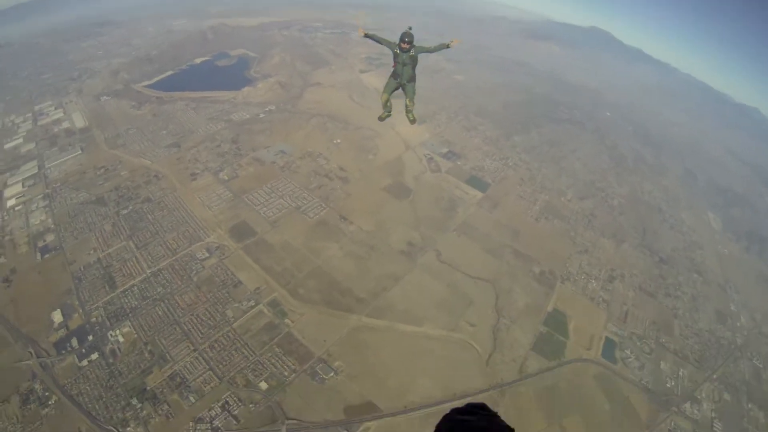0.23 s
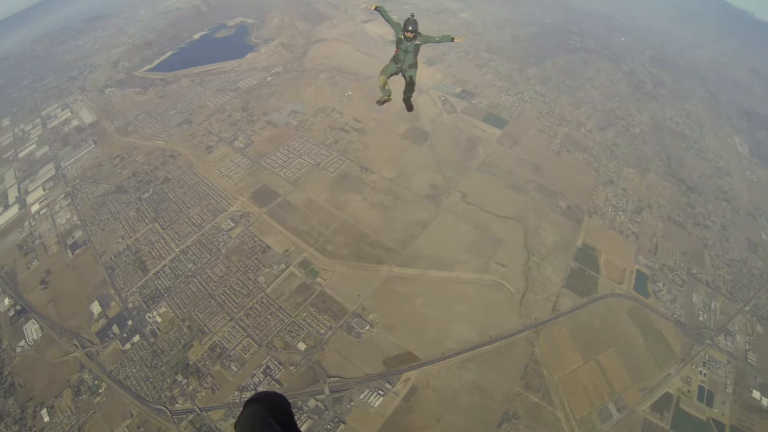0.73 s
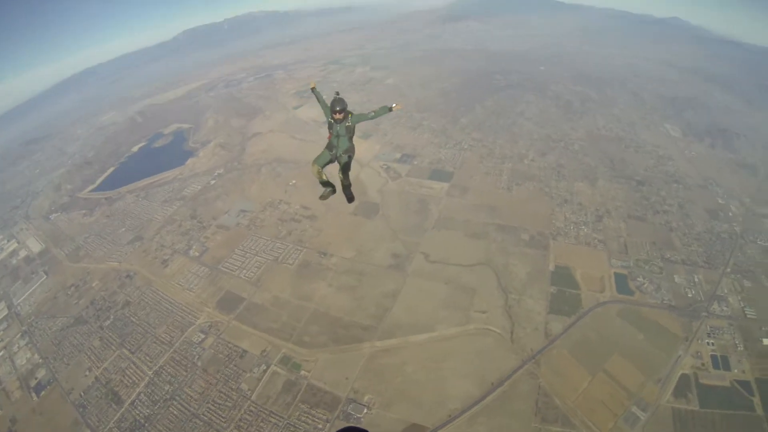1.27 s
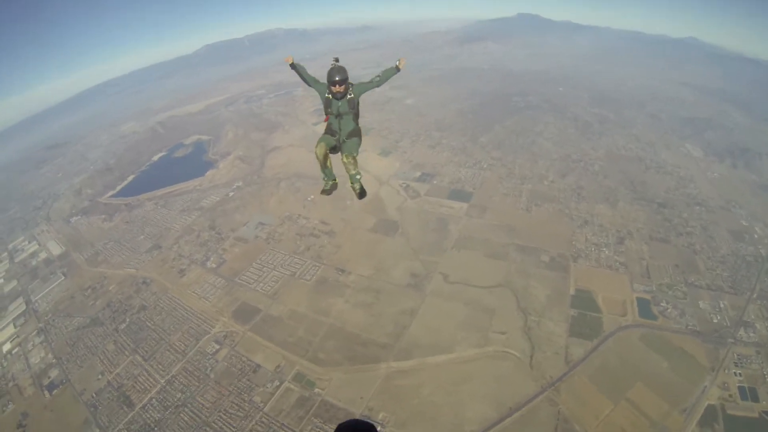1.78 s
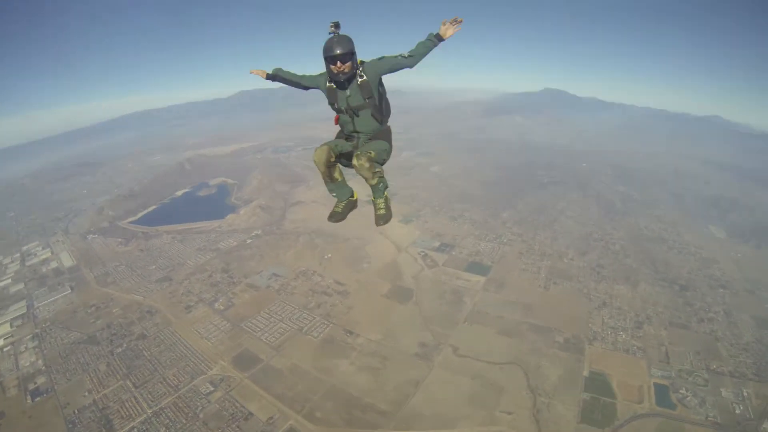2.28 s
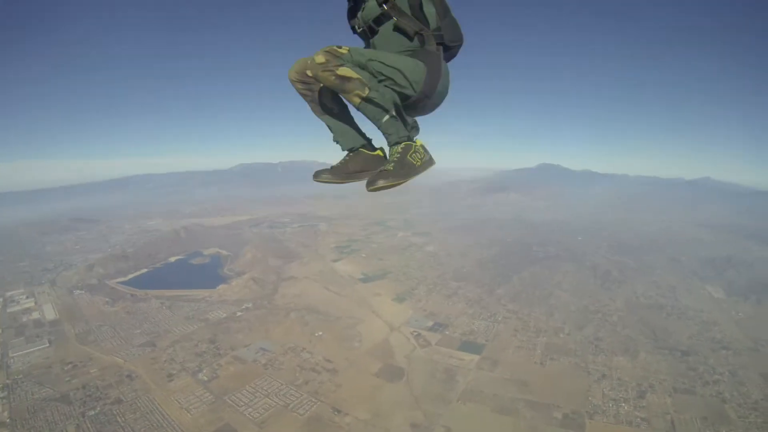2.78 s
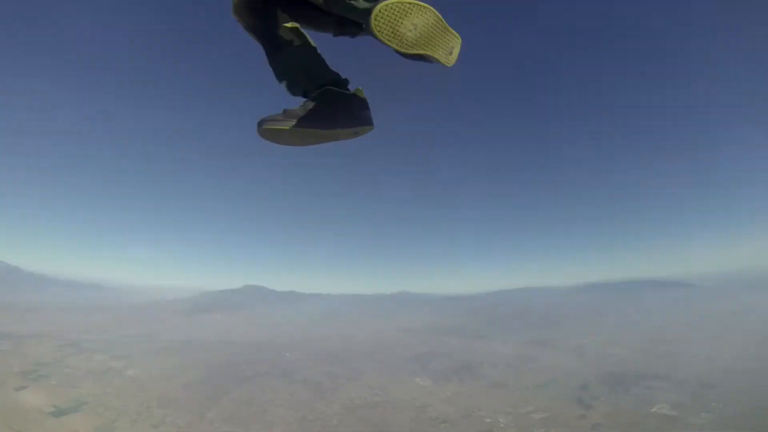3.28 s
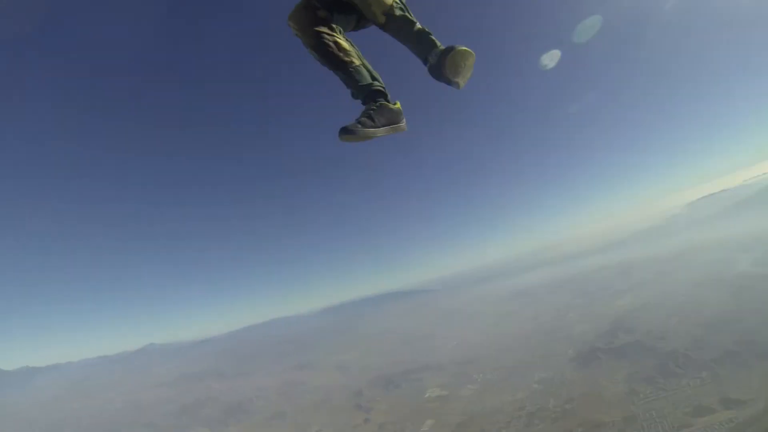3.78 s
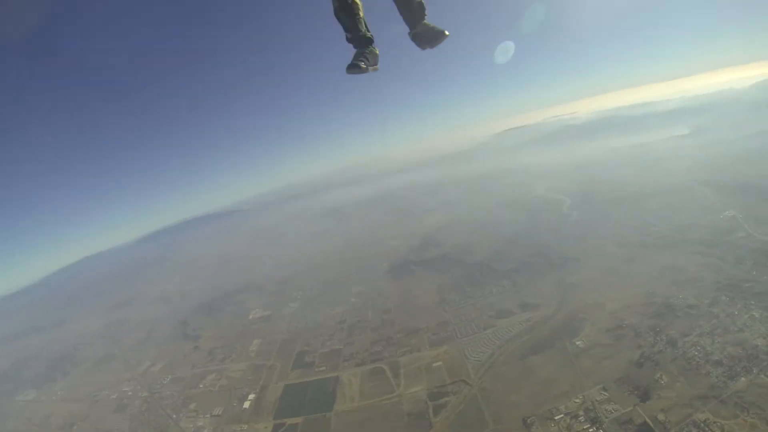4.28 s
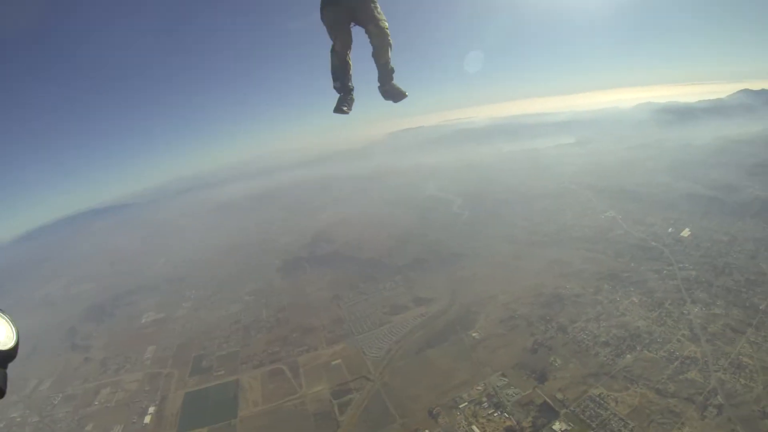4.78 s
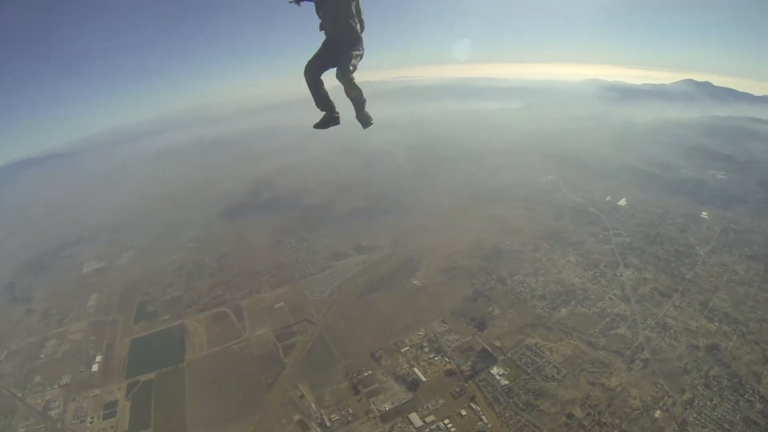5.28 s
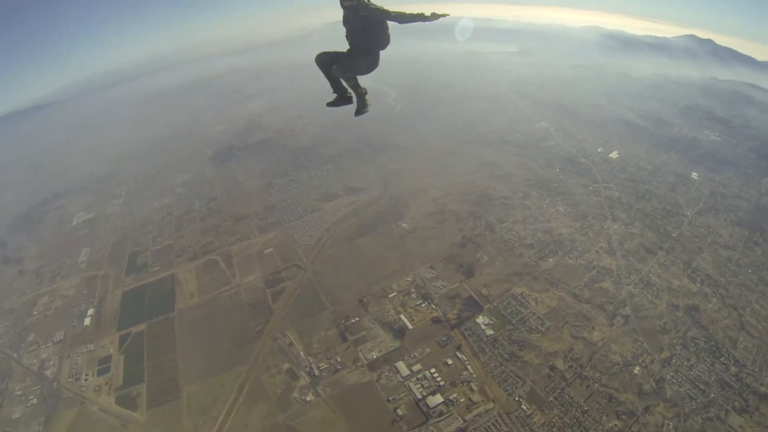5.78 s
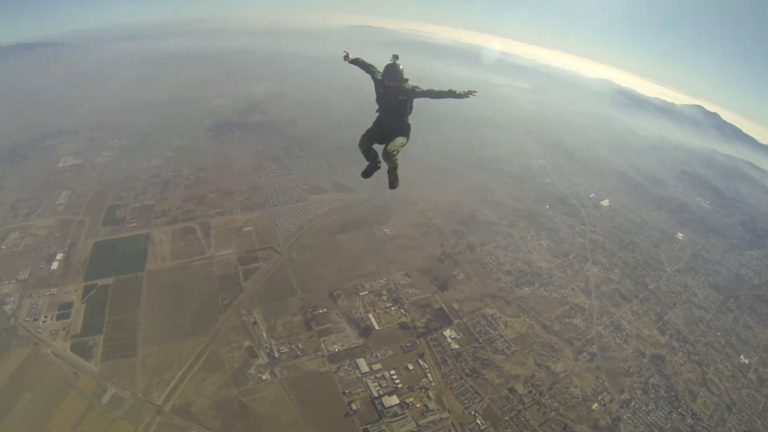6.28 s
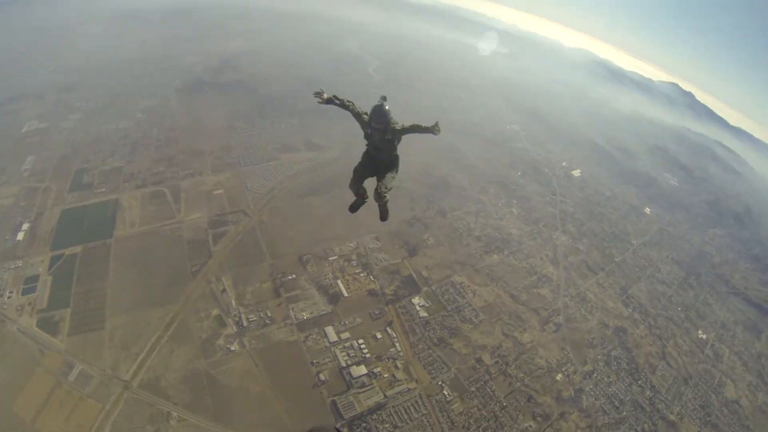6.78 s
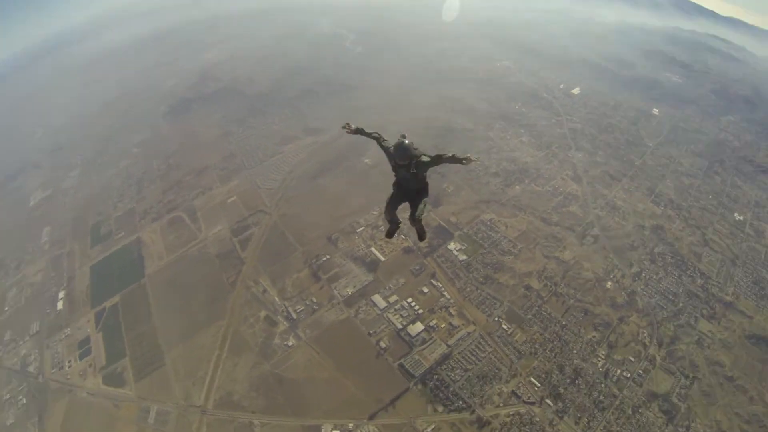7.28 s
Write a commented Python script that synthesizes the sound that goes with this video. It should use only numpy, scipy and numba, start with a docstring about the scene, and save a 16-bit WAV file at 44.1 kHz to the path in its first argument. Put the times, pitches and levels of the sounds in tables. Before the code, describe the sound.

Continuous loud wind in skydiving freefall, heard right at a body-worn camera microphone. It starts as a strong hissy rush, soon darkens into low tumbling rumble with uneven gusts, thumps, brief lulls and crackly slaps, then after about six seconds the bright rush returns and swells to the end.

```python
"""Freefall, heard by a camera worn on the body. It opens in the clean airstream: strong rush, high hiss.
Before 1 s it turns into the body's wake: the hiss sinks, eddies shed by the body thump on the microphone,
torn air rings the cavities of the housing in ragged bursts, a seam half whistles, hard eddies slap.
From about 6 s it faces the clean stream again: the rush steadies, the hiss rises, two hard slaps near 7.3 s.
Noise coloured by spectra and resonances makes the layers; gain control ducks the biggest peaks."""
import sys
import numpy as np
from scipy import signal
from scipy.fft import rfft, irfft, next_fast_len
from scipy.io import wavfile
from scipy.ndimage import uniform_filter1d
from numba import njit

SR = 44100
rng = np.random.default_rng(int(sys.argv[2]) if len(sys.argv) > 2 else 0)


def dump_mix(stems):
    """Bounce the given channels to the path in sys.argv[1] as a 16-bit WAV at rate SR."""
    frames = np.atleast_2d(stems).T  # one column per channel
    limited = np.clip(frames, -1, 1)  # hard clip at full scale
    pcm = np.round(limited * 32767).astype(np.int16)
    wavfile.write(sys.argv[1], SR, pcm)


N = 332073


def undb(db):
    """Decibels to amplitude gain."""
    return 10 ** (np.asarray(db) / 20)


def unit(x):
    """Scale to rms 1."""
    return x / np.sqrt(np.mean(x ** 2))


def curves(table):
    """Columns of a table, joined by straight lines in time."""
    time_s, *columns = np.transpose(table)
    return [np.interp(np.arange(N) / SR, time_s, column) for column in columns]


def swells(table):
    """Sum of smooth bumps in dB from rows (centre_s, length_s, height_db, ..); one curve per height."""
    t = np.arange(N) / SR
    total_db = 0
    for centre_s, length_s, *heights_db in table:
        bump_s = centre_s + length_s * np.linspace(-0.5, 0.5, 33)
        bump = np.interp(t, bump_s, np.hanning(33))
        total_db = total_db + np.outer(heights_db, bump)
    return total_db


def colour(x, spectrum, resonances=()):
    """Minimum-phase filter: a smooth spectrum with resonant humps on top; output rms 1."""
    size = next_fast_len(N + SR // 2, True) * 2
    f_hz = np.maximum(np.arange(size // 2 + 1) * SR / size, 1)
    point_hz, point_db = np.transpose(spectrum)
    gain_db = np.interp(np.log(f_hz), np.log(point_hz), point_db)
    for centre_hz, width_hz, lift_db in resonances:
        gain_db = gain_db + lift_db / (1 + (2 * (f_hz - centre_hz) / width_hz) ** 2)
    # folding the cepstrum onto positive time makes the filter causal
    cepstrum = irfft(np.log(undb(gain_db)))[:size // 2]
    cepstrum[1:] *= 2
    response = np.exp(rfft(cepstrum, size))
    return unit(irfft(rfft(x, size) * response)[:N])


@njit
def resonate(x, hz, damping):
    """State-variable band-pass whose centre moves."""
    y, band, low = np.empty(len(x)), 0., 0.
    for i in range(len(x)):
        g = np.tan(np.pi * hz[i] / SR)
        v = (band + g * (x[i] - low)) / (1 + g * (g + damping))
        band, low, y[i] = 2 * v - band, low + 2 * g * v, v
    return y


def swirl(slow_hz, fast_hz):
    """Random unsteadiness between two rates, rms 1, extremes softly limited."""
    band = signal.butter(1, [slow_hz, fast_hz], "band", fs=SR, output="sos")
    smooth = signal.butter(2, 2 * fast_hz, fs=SR, output="sos")
    wander = unit(signal.sosfilt(np.vstack([band, smooth]), rng.standard_normal(N)))
    return unit(np.tanh(wander / 2))


def steady(x, span_s):
    """Divide by the running rms: slow swells go, fast ones stay."""
    return x / np.sqrt(uniform_filter1d(x ** 2, int(span_s * SR)) + 1e-9)


def air(strength_db):
    """Turbulent pressure: white noise whose strength follows a curve."""
    return rng.standard_normal(N) * undb(strength_db)


def eddy_train(per_s=420, life_s=0.0086, memory_s=0.05, scatter=0.65):
    """Eddies drift past at random, each a brief swell of turbulence; rms 1."""
    arrivals = (rng.random(N) < per_s / SR) * np.exp(scatter * rng.standard_normal(N))
    age = np.linspace(0, 1, int(life_s * SR))
    push = signal.fftconvolve(arrivals, age ** 2 * (1 - age) ** 3)[:N]
    push = unit(push - uniform_filter1d(push, int(memory_s * SR)))
    return unit(np.tanh(push / 2))


# how air meets the camera as the body turns; levels before layer trim: time_s, shedding_hz, surge_db, buffet_db
BODY_ANGLE = [(0, 136, -27, -17.5), (.8, 123, -25.5, -17), (1.2, 106, -35, -16), (1.6, 124, -30, -20),
              (2.0, 101.6, -25, -15), (2.5, 112, -31.5, -16.5), (3.0, 102, -23, -17.5), (3.6, 97, -23, -17),
              (3.85, 98, -23.5, -19), (4.2, 106, -28, -17), (4.5, 104, -29.5, -17), (5.0, 92, -30.5, -15.5),
              (5.5, 94, -29, -15.5), (5.9, 98, -27, -17), (6.2, 135, -26, -15), (6.8, 118, -31.5, -17.5),
              (7.53, 133, -25.5, -18)]


def body_angle():
    """The body's attitude sets the eddy shedding rate and the strength of the deep layers."""
    return curves(BODY_ANGLE)


# air tearing past the camera; levels before layer trim: time_s, rush_db, hiss_db, flutter_db
AIRFLOW = [(0, -24.5, -36.5, -26.5), (.22, -22, -30.5, -27), (.4, -24, -32, -27.5), (.6, -20, -26, -28),
           (.78, -22.5, -32.5, -24), (.92, -27.5, -40, -29), (1.3, -30.5, -45.5, -31),
           (2.2, -30, -51.5, -27), (2.7, -31.5, -52.5, -29), (3.65, -26, -46.5, -25.5),
           (4.15, -30.5, -53.5, -30), (5.0, -34, -53.5, -31), (6.0, -28.5, -45.5, -27.5),
           (6.12, -22.5, -38.5, -26.5), (6.55, -25, -38, -27), (6.85, -29, -41.5, -29),
           (7.1, -24.5, -36, -27), (7.53, -21, -29, -26.5)]
# gusts that swell and ebb: crest_s, length_s, rush_and_hiss_lift_db, flutter_lift_db
GUST_SWELLS = [(1.39, 0.11, 5.5, 2), (1.58, 0.2, 4.5, 3), (2.32, 0.1, 4.5, 2), (2.53, 0.044, 5, 3),
               (2.85, 0.08, 5.5, 5.5), (2.96, 0.21, 3.5, 2.5), (3.035, 0.034, 7.5, 11.5),
               (3.42, 0.35, 1, 0), (3.61, 0.085, 4.5, 4.5), (3.86, 0.097, 2.5, 4.5), (4.02, 0.038, 1, 6),
               (4.33, .06, 1, 8.5), (4.44, 0.19, 3.5, 5), (4.72, 0.28, 4, 3), (5.1, 0.11, 4.5, 5),
               (5.43, 0.23, 1.5, 2.5), (5.68, .08, 3, 7), (7.07, 0.12, 4, 6), (7.32, 0.12, 2.5, 6.5)]
# lulls where the stream lifts off the housing: lowest_s, length_s, dip_db
LULL_DIPS = [(.33, 0.17, -5), (.85, 0.089, -4.5), (1.28, 0.17, -3), (1.74, 0.16, -1), (2.61, 0.15, -6),
             (3.11, 0.26, -3), (3.53, 0.077, -7.5), (4.195, 0.057, -8), (4.58, 0.13, -3), (5.25, 0.15, -3),
             (5.54, 0.11, -8), (5.96, 0.13, -4.5), (6.74, 0.13, -3)]


def airstream():
    """Rush, hiss and flutter levels and eddy depth; gusty in the wake, smoother in the clean stream."""
    rush_db, hiss_db, flutter_db = curves(AIRFLOW)
    # more hiss: the camera faces the clean stream more squarely, eddies are shallower
    depth_db = np.interp(hiss_db, [-45, -37], [3.9, 1.9])
    gustiness = swirl(slow_hz=5.2, fast_hz=21) * depth_db / depth_db.max()
    gust_db, flap_db = swells(GUST_SWELLS)
    lull_db, = swells(LULL_DIPS)
    rush_db = rush_db + gust_db + lull_db + 1.35 * gustiness
    hiss_db = hiss_db + gust_db + lull_db + 0.8 * gustiness
    flutter_db = flutter_db + flap_db + lull_db + gustiness
    return rush_db, hiss_db, flutter_db, depth_db


# deep spectrum, relative: freq_hz, level_db
SURGE_SPECTRUM = [(10, -20), (22, 0.5), (45, 5), (65, 5), (100, -3), (200, -57), (600, -88)]


def surge():
    """The largest eddies heave against the microphone."""
    return steady(colour(rng.standard_normal(N), SURGE_SPECTRUM), span_s=0.2)


# rumble spectrum, relative: freq_hz, level_db
BUFFET_SPECTRUM = [(20, -8.5), (50, -3.5), (88, 1), (120, -1), (160, 0), (205, -5.5), (280, -13.5),
                   (500, -27.5), (1200, -70)]


def buffeting(shedding_hz, damping=0.58):
    """Eddies shed by the body at a loose rate: a deep, tumbling rumble."""
    rumble = colour(rng.standard_normal(N), BUFFET_SPECTRUM)
    return steady(resonate(rumble, shedding_hz, damping), span_s=0.1)


# heaviest thumps of the rumble: crest_s, length_s, lift_db
RUMBLE_THUMPS = [(.27, 0.11, 1), (.81, 0.095, 7), (1.38, .07, 9), (1.59, 0.077, 12), (1.7, .06, 10),
                 (3.052, .03, 8.5), (4.03, 0.032, 10.5), (4.165, 0.028, 2), (4.47, 0.085, 5),
                 (5.12, .03, 1), (6.71, 0.038, 6.5)]
# stalls in the shedding, where the rumble thins: lowest_s, length_s, dip_db
SHEDDING_STALLS = [(.45, 0.33, -2), (3.56, .08, -12), (4.1, .11, -11), (4.2, 0.052, -14), (5.61, 0.088, -7),
                   (6.04, 0.25, -6), (7.0, 0.099, -6)]


def thumps_and_stalls(throb_db=1.5):
    """Rumble level change: heavy eddies, stalled shedding and a random throb; in dB."""
    throb = throb_db * swirl(slow_hz=6, fast_hz=14)
    return swells(RUMBLE_THUMPS)[0] + swells(SHEDDING_STALLS)[0] + throb


# flapping spectrum, relative: freq_hz, level_db
FLUTTER_SPECTRUM = [(100, -18), (220, 2.5), (300, -1.5), (390, -2), (520, -9), (680, -12), (1000, -30),
                    (2500, -55.5)]


def flutter(eddies, depth_db=2.0):
    """Smaller eddies flap against the housing."""
    return steady(colour(air(depth_db * eddies), FLUTTER_SPECTRUM), span_s=0.101)


# hiss spectrum, relative: freq_hz, level_db
HISS_SPECTRUM = [(1500, -7), (3000, -1), (4800, -3.5), (6600, -0.5), (7800, -11), (9300, -13), (10300, -14),
                 (12000, -23.5), (15000, -29)]
# cavity resonances of the housing: centre_hz, width_hz, lift_db
HOUSING_CAVITIES = [(1440, 406, 10.5), (1820, 396, 9.5), (2487, 370, 7.5), (3296, 440, 10.5),
                    (3830, 150, 4.5), (4600, 250, 2.5), (7940, 500, 0.5), (9460, 370, 1.5),
                    (11150, 1500, 2.5)]


def hiss(tearing_db):
    """The finest turbulence hisses at the microphone port, through the three highest cavities."""
    return steady(colour(air(tearing_db), HISS_SPECTRUM, HOUSING_CAVITIES[-3:]), span_s=0.087)


# sizzle spectrum, relative: freq_hz, level_db
SIZZLE_SPECTRUM = [(4000, -28), (7200, -6), (8100, -4), (9200, -4), (10100, -11), (11600, -8.5),
                   (12600, -15), (15000, -32)]
# narrow resonances of the microphone port: centre_hz, width_hz, lift_db
PORT_RESONANCES = [(8100, 350, 8), (9240, 400, 8), (10900, 300, 5), (11650, 400, 0.5)]


def sizzle(tearing_db, share=0.86, spit_db=6):
    """Air grazing the port spits in a thin, high sizzle."""
    strength_db = share * tearing_db + spit_db * swirl(30, 300)
    return steady(colour(air(strength_db), SIZZLE_SPECTRUM, PORT_RESONANCES), span_s=0.32)


# air grazing the port, added to the hiss curve: time_s, sizzle_db
PORT_GRAZE = [(0, -16), (.8, -15), (1.5, -7), (2.5, -4), (3.6, -9), (3.85, 0), (4.2, 1.5), (4.5, -4),
              (5.0, -7.5), (5.5, -4), (5.9, -6.5), (6.2, -10), (7.53, -18)]


def grazing():
    """How strongly the stream grazes the port; in dB."""
    return curves(PORT_GRAZE)[0]


def seam(tearing_db, ring_hz=3350, damping=0.15, wander=0.022, flicker_db=2.5):
    """Air across a housing seam half whistles, catching and letting go, its pitch unsteady."""
    centre_hz = ring_hz * (1 + wander * swirl(2.5, 29.4))
    jet = air(tearing_db + flicker_db * swirl(7.9, 43))
    ring = resonate(jet, centre_hz, damping)
    return steady(resonate(ring, centre_hz, damping), span_s=0.24)


# spells when air catches the seam: crest_s, length_s, lift_db
SEAM_SPELLS = [(.1, .55, 8.5), (.95, 0.55, 6.5), (1.6, 0.68, 11.5), (2.9, 0.2, 8), (3.6, 0.39, 9),
               (4.45, 0.4, 7.5), (4.73, 0.31, 7), (5.45, 0.36, 10.5), (6.35, 1, 7), (7.2, 0.89, 6)]


def seam_catch(base_db=-15.5):
    """Seam ring added to the rush curve: faint between spells, lifted during them; in dB."""
    return base_db + swells(SEAM_SPELLS)[0]


# torn-air spectrum, relative: freq_hz, level_db
RUSH_SPECTRUM = [(200, -1.5), (600, -3), (1000, -1), (1600, -2.5), (2100, -6.5), (2850, -10.5),
                 (4100, -13.5), (6500, -17), (9000, -26), (12000, -34.5), (15000, -72)]


def rush(tearing_db, share=0.42, shift_db=1.0):
    """Torn air rings the housing cavities, now the deeper ones, now the higher."""
    cavities = colour(air(share * tearing_db), RUSH_SPECTRUM, HOUSING_CAVITIES)
    deeper = signal.sosfiltfilt(signal.butter(4, 1620, fs=SR, output="sos"), cavities)
    lean = undb(shift_db * swirl(2.0, 71))
    return steady(deeper * lean + (cavities - deeper) / lean, span_s=0.08)


# single hard eddies that slap the housing; levels before trim: start_s, level_db
HARD_EDDIES = [(0.6244, -14), (1.433, -15), (1.502, -13), (1.555, -17), (1.6718, -10.5), (1.7814, -17),
               (2.0564, -13), (2.531, -13), (2.828, -21), (3.042, -10), (3.1547, -17), (3.2258, -10),
               (3.416, -12), (3.5723, -8.5), (3.606, -12), (3.8908, -8.5), (4.023, -11.5), (4.2242, -14.5),
               (4.3234, -16), (4.617, -13.5), (5.149, -19), (5.1868, -12), (5.315, -13), (5.4405, -15),
               (5.6815, -9), (5.731, -14), (5.954, -21), (7.314, -4), (7.338, -6)]


def slaps(rise_s=0.0018, trim_db=-6):
    """A hard eddy builds in a couple of milliseconds and dies in a few more."""
    t, strength = np.arange(N) / SR, np.zeros(N)
    for start_s, level_db in HARD_EDDIES:
        age = np.maximum(t - start_s, 0) / rise_s
        strength += undb(level_db + trim_db) * age ** 2 * np.exp(2 * (1 - age))
    return strength * colour(rng.standard_normal(N), RUSH_SPECTRUM, HOUSING_CAVITIES)


def hush(lead_s=0.011, width_s=0.0035, lull_db=-5):
    """The flow stalls for a moment ahead of each hard eddy; in dB."""
    t = np.arange(N) / SR
    return lull_db * sum(np.exp(-((t - start_s + lead_s) / width_s) ** 2) for start_s, _ in HARD_EDDIES)


def scene(grain_db=3.0):
    """One eddy train drives flutter, rush, seam, hiss and sizzle over the deep rumble."""
    shedding_hz, surge_db, buffet_db = body_angle()
    rush_db, hiss_db, flutter_db, depth_db = airstream()
    buffet_db = buffet_db + thumps_and_stalls()
    eddies = eddy_train()
    tearing_db = depth_db * eddies + grain_db * swirl(slow_hz=150, fast_hz=875) + hush()

    rumble = undb(surge_db + 3.5) * surge() + undb(buffet_db) * buffeting(shedding_hz)
    flapping = undb(flutter_db + 1.34) * flutter(eddies)
    port = undb(hiss_db - 3.6) * hiss(tearing_db)
    port += undb(hiss_db + grazing()) * sizzle(tearing_db)
    housing = undb(rush_db + seam_catch()) * seam(tearing_db)
    housing += undb(rush_db + 1.1) * rush(tearing_db)
    return (rumble + flapping + port + housing + slaps())[None]


@njit
def follow(x, attack, release):
    """Peak follower: quick up, slow down; rates per sample."""
    out, level = np.empty(len(x)), 0.
    for i in range(len(x)):
        level += (x[i] - level) * (attack if x[i] > level else release)
        out[i] = level
    return out


def record(dry, ceiling_db=-7, attack_s=0.00083, release_s=0.1, top_hz=15200):
    """Gain control ducks everything while the followed peak tops the ceiling; a low-pass cuts the top."""
    peak = follow(np.abs(dry[0]), 1 / (attack_s * SR), 1 / (release_s * SR))
    held = dry / np.maximum(peak / undb(ceiling_db), 1)
    return signal.sosfilt(signal.ellip(10, 0.2, 80, top_hz, fs=SR, output="sos"), held)


dry = scene()
out = record(dry)
dump_mix(out)
```